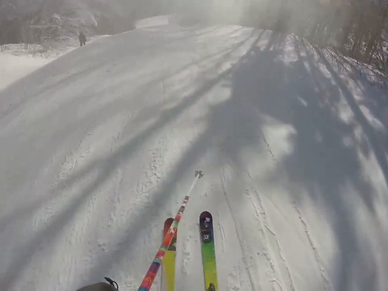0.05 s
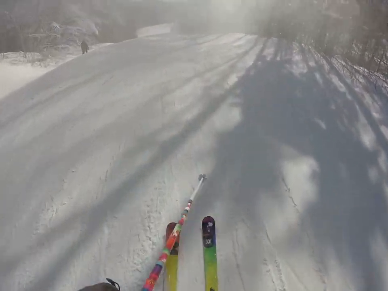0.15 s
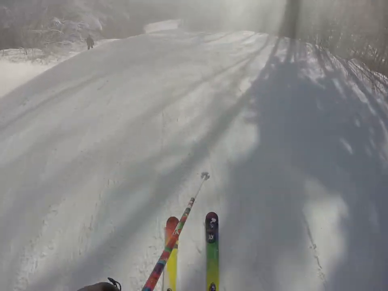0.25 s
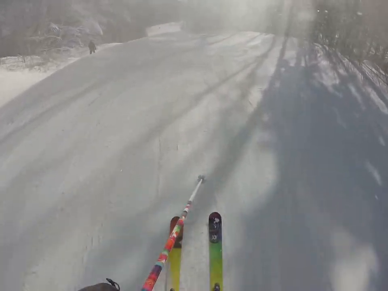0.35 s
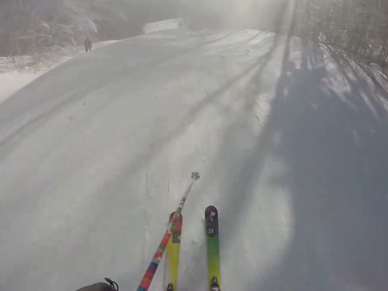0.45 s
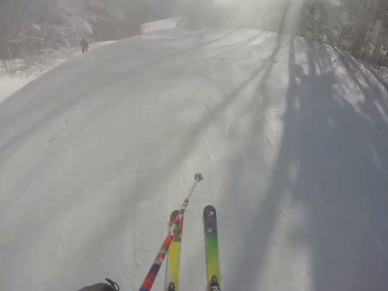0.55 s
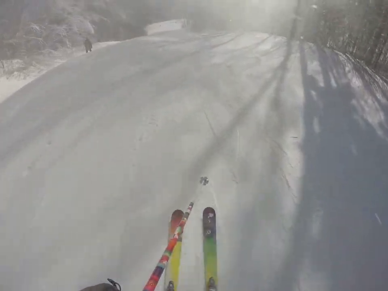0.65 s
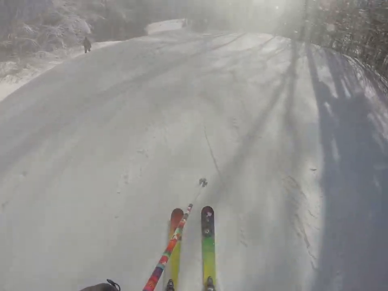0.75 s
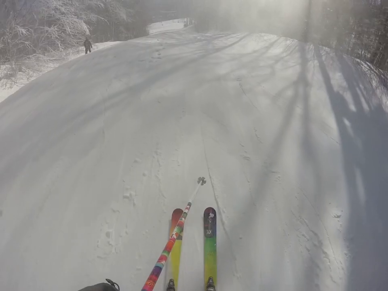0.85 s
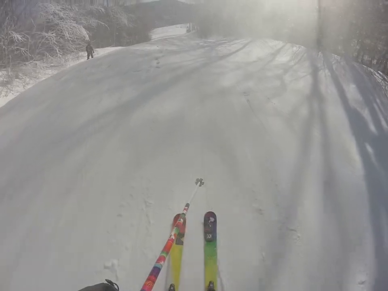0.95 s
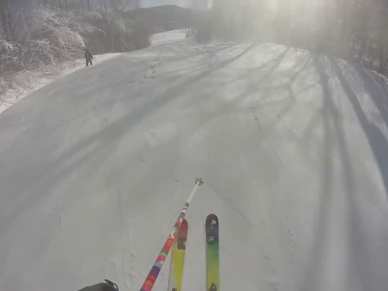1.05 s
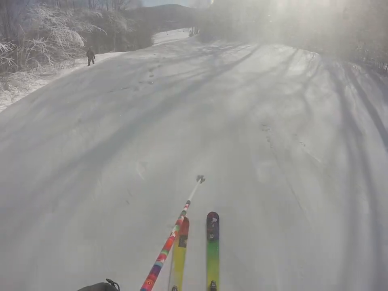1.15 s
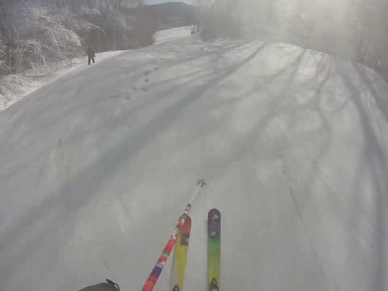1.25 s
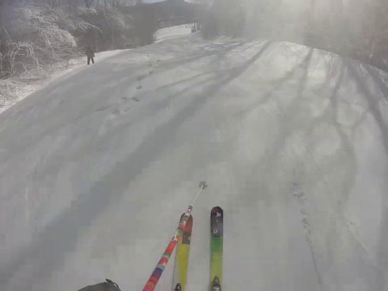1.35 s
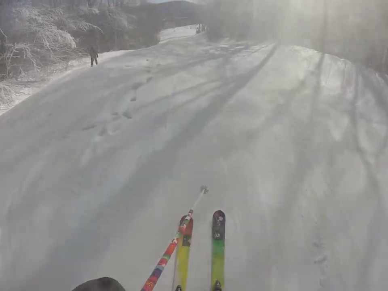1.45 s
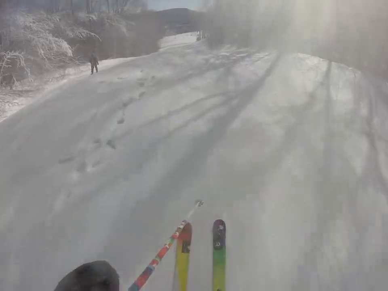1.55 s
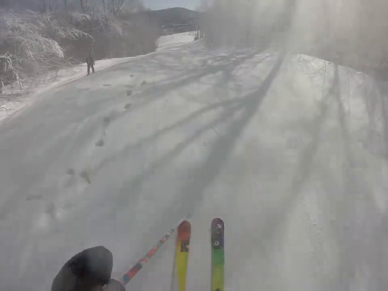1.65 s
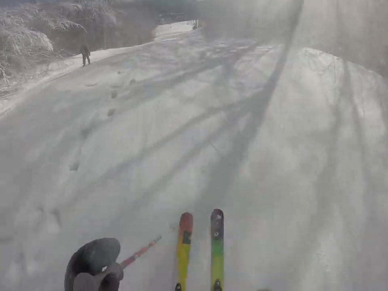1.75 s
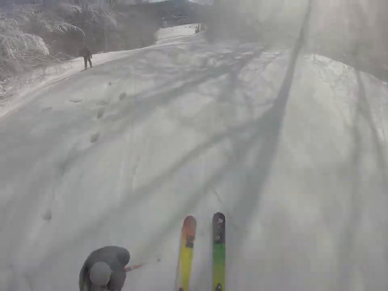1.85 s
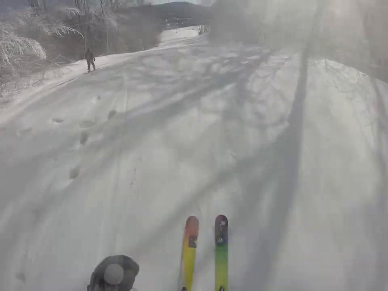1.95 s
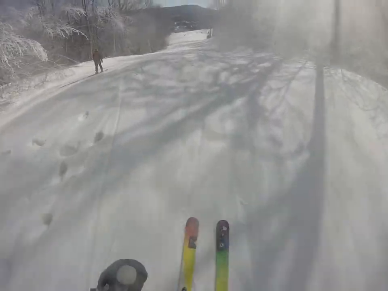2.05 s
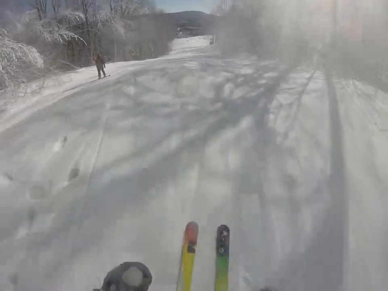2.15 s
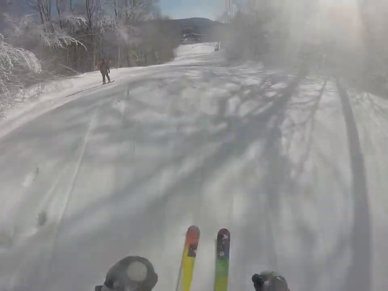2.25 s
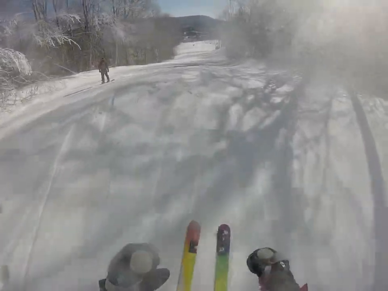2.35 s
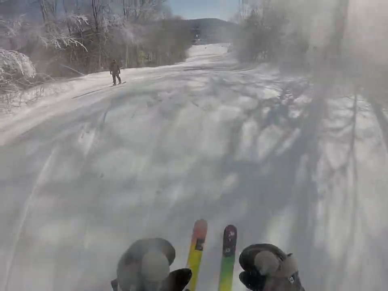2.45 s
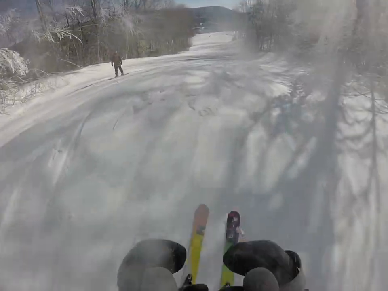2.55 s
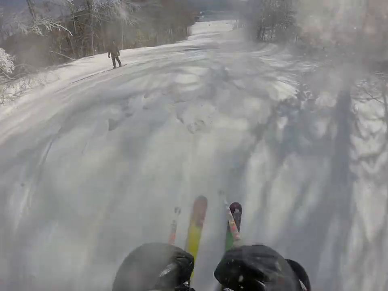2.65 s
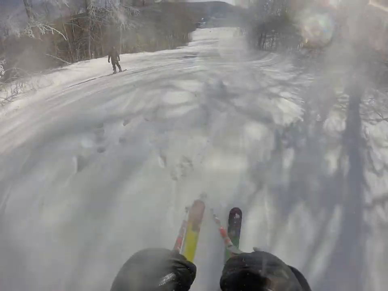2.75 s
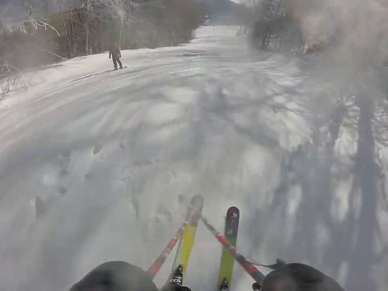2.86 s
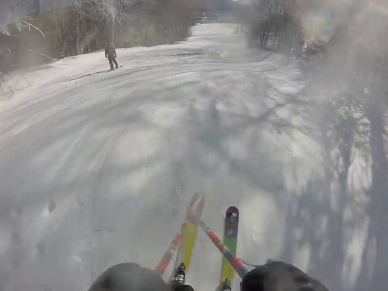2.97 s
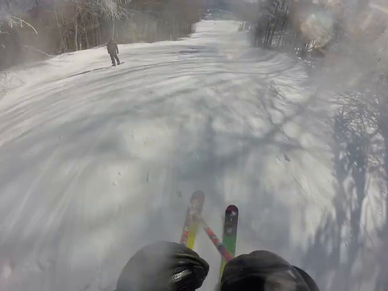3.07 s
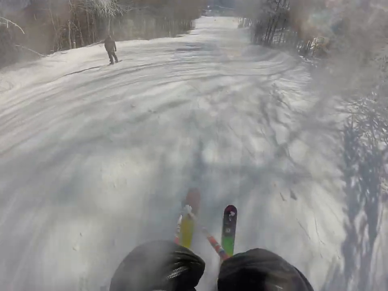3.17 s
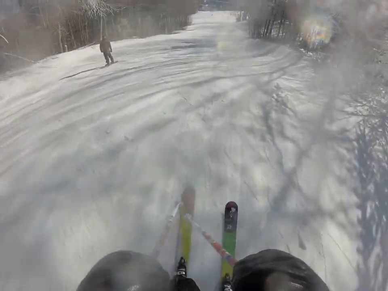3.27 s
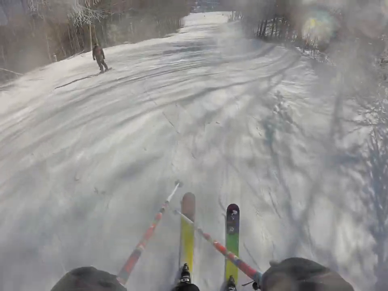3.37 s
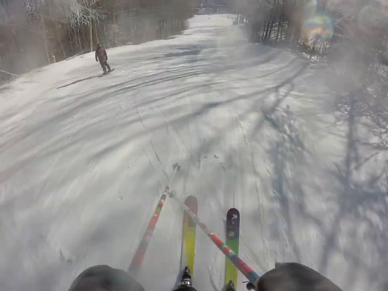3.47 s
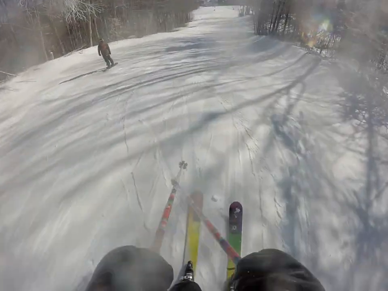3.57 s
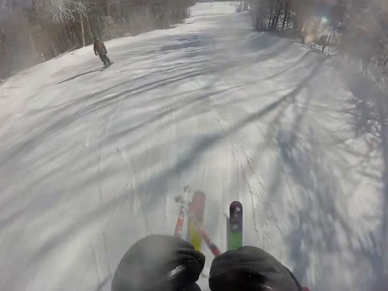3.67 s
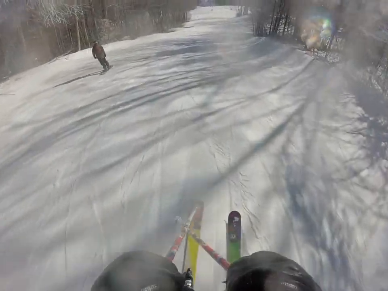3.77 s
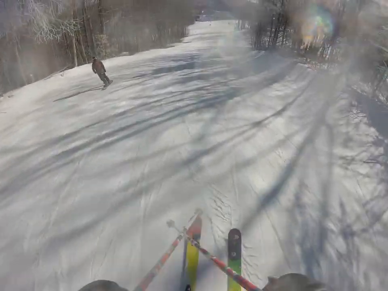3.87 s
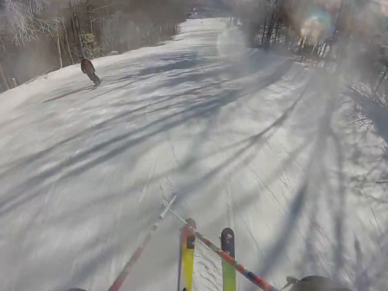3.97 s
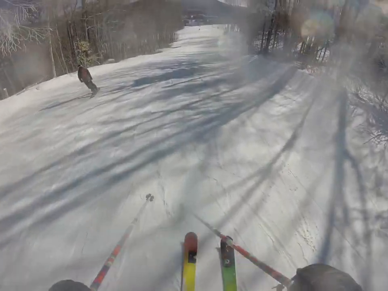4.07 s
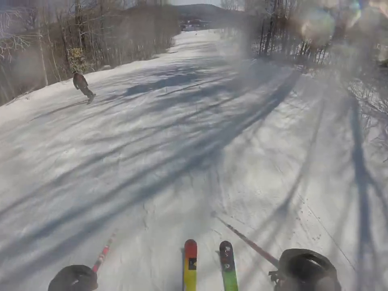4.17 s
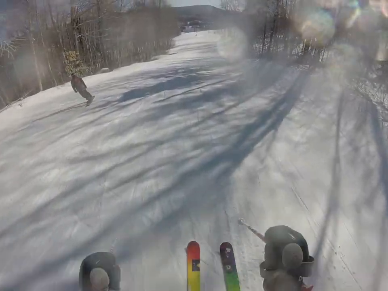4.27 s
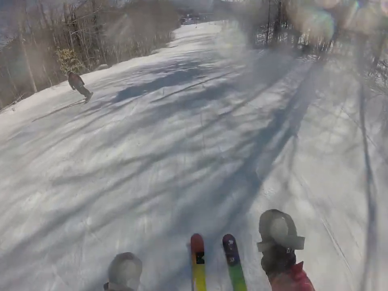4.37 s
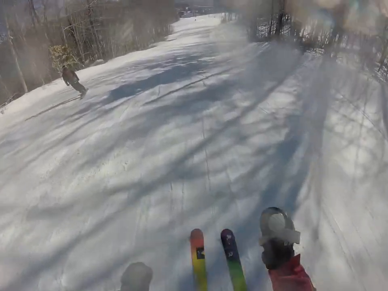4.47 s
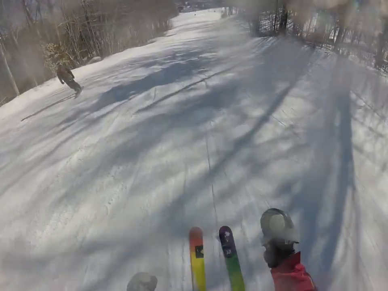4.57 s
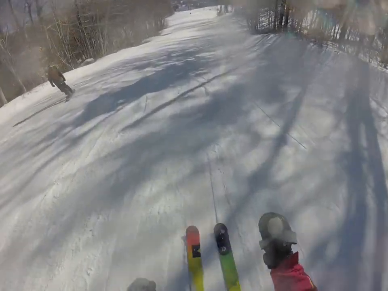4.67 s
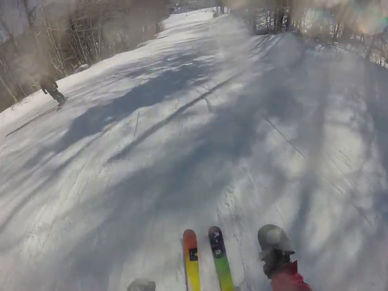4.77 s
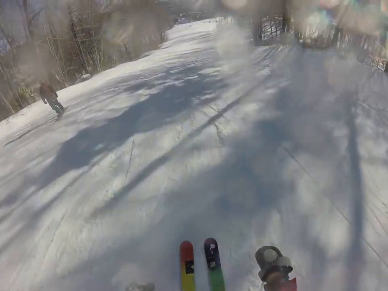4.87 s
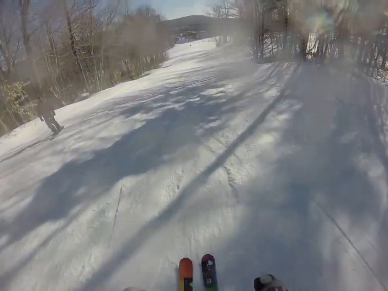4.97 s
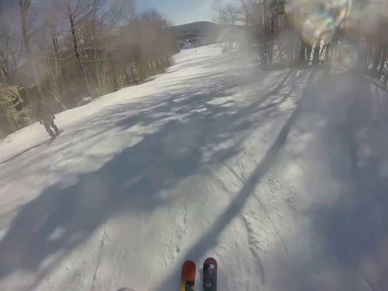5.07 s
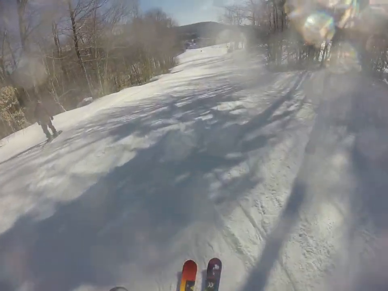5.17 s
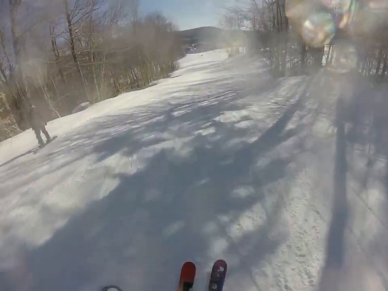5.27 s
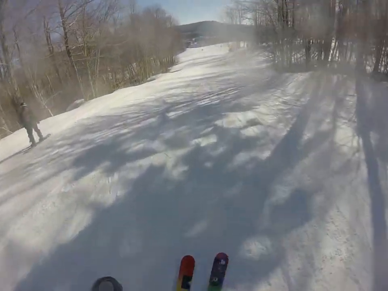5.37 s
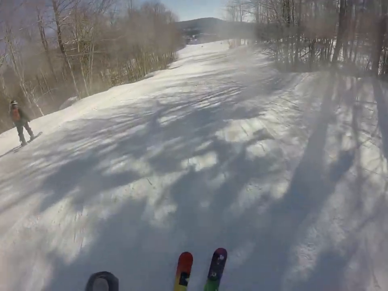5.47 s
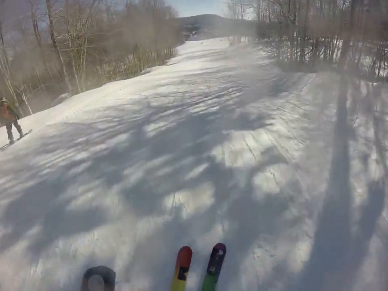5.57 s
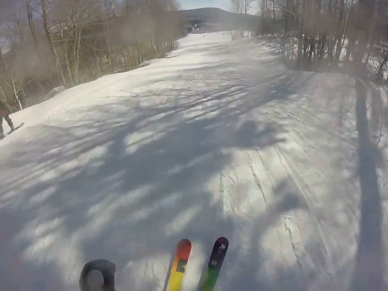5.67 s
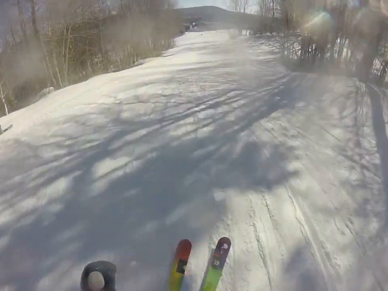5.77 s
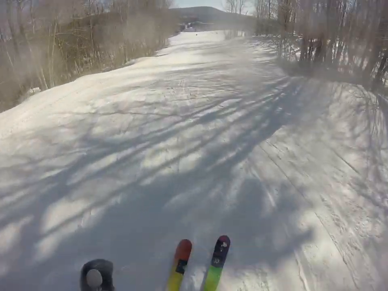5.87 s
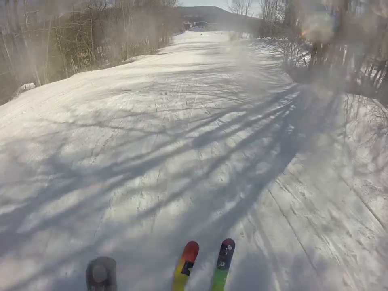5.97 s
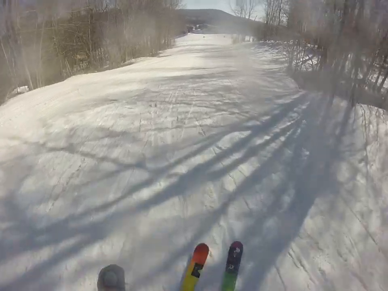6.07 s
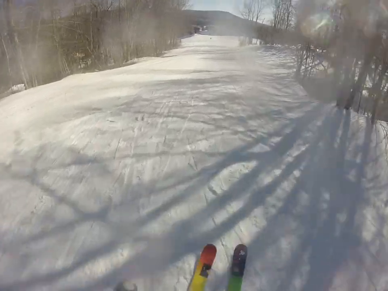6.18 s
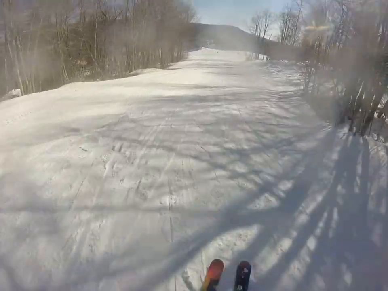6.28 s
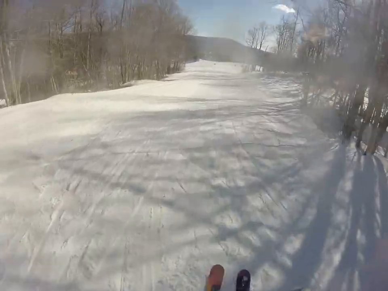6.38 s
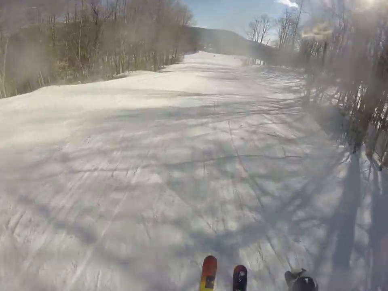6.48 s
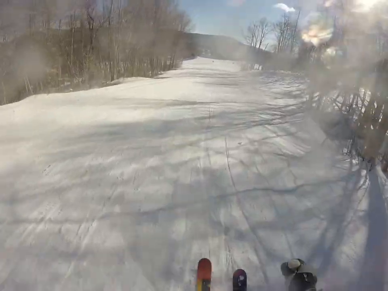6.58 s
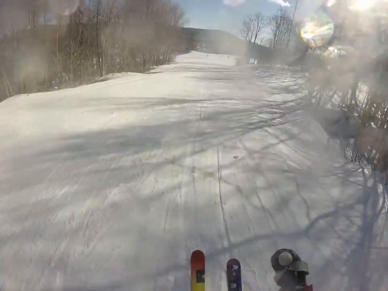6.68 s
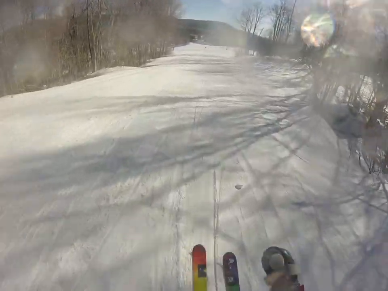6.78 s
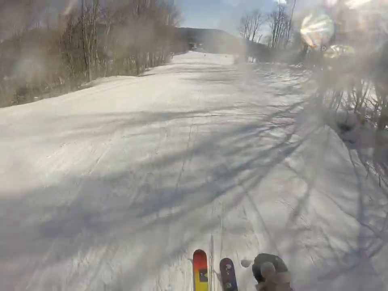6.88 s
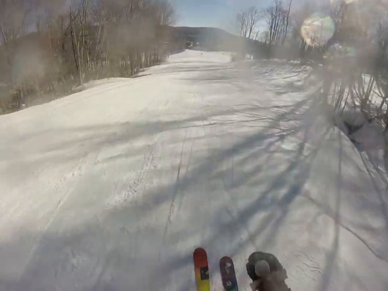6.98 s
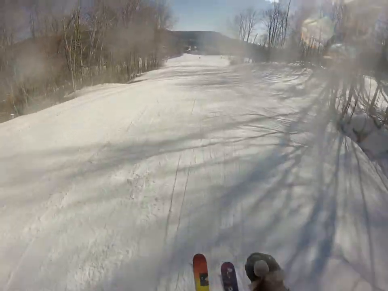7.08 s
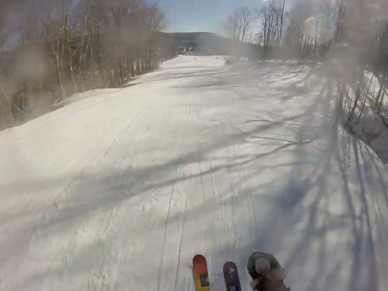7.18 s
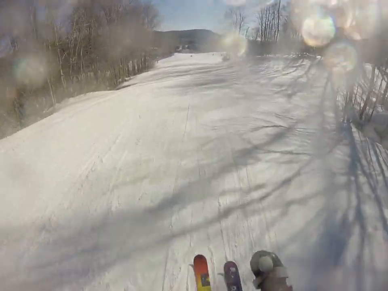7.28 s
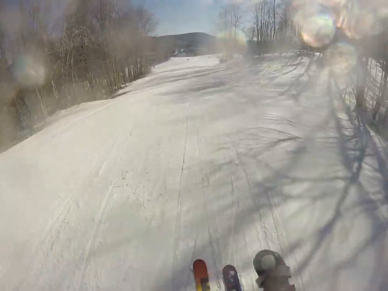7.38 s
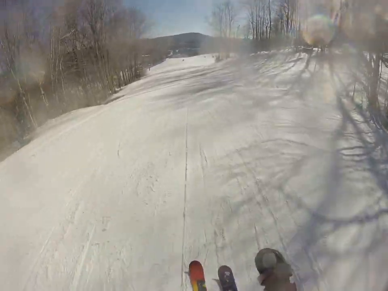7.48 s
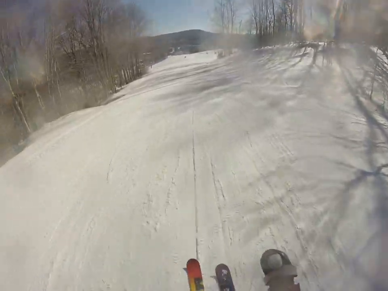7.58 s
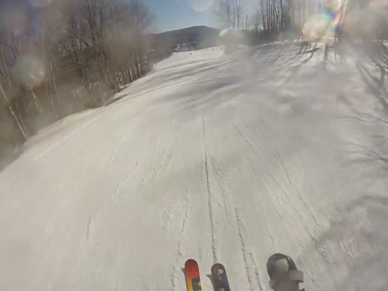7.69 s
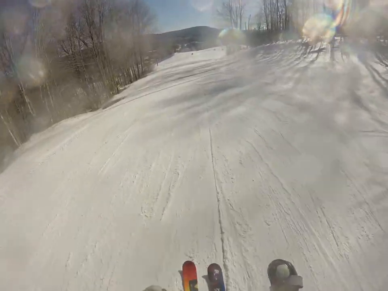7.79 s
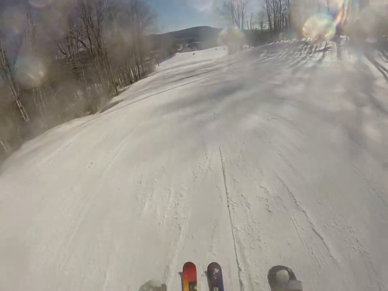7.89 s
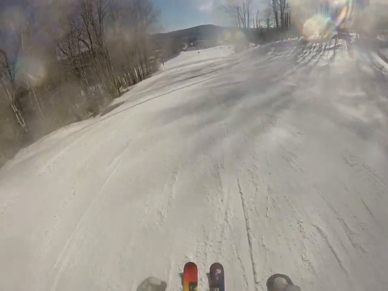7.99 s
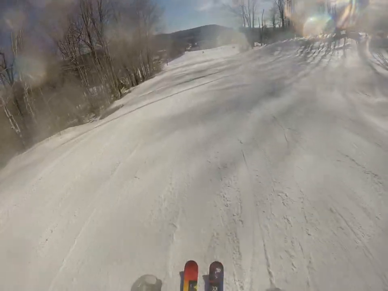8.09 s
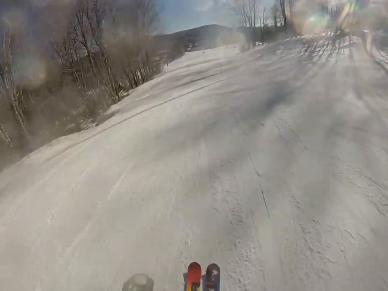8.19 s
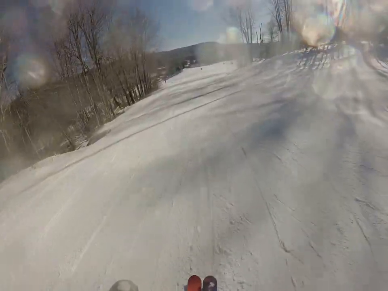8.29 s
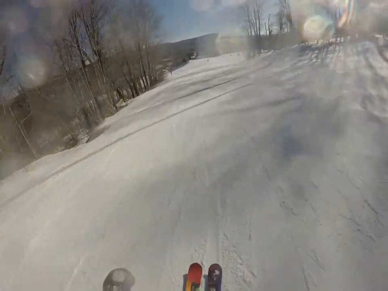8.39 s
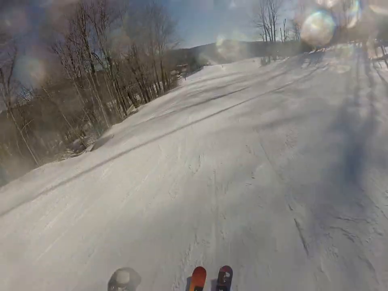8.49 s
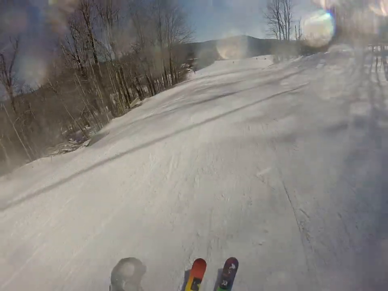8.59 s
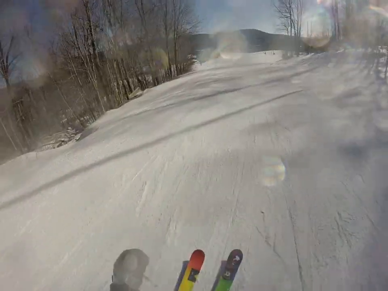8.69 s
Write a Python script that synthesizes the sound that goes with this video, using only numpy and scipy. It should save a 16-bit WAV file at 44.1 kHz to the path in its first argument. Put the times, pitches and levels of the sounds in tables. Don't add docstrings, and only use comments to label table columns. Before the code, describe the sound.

Rough gritty scraping and crackling on a camera case over ski hiss and low wind rumble, then hard knocks, then quieter steady gliding.

```python
import sys
import numpy as np
from scipy import signal
from scipy.fft import rfft, irfft, next_fast_len
from scipy.io import wavfile
from scipy.ndimage import uniform_filter1d

SR = 44100
rng = np.random.default_rng(int(sys.argv[2]) if len(sys.argv) > 2 else 0)


def inscribe(sig):
    pcm = np.round(np.clip(np.atleast_2d(sig).T, -1, 1) * 32767)
    wavfile.write(sys.argv[1], SR, pcm.astype(np.int16))


def invert_db(x):
    u = np.asarray(x, float) / 20
    return 10 ** u


N = 385434
t = np.arange(N) / SR

# t/s, hiss level/dB, shake level/dB
GLIDE = [(0.0, -40, -41), (0.9, -35.5, -39.5), (1.3, -39.5, -42.5), (1.6, -31.5, -40.5), (2.2, -41, -41.5),
         (2.5, -34, -46.5), (3.0, -39, -45.5), (3.41, -46, -49), (3.85, -44.5, -54), (4.1, -41, -42.5),
         (4.75, -42, -41), (5.43, -38, -38.5), (5.9, -38.5, -38.5), (6.26, -41.5, -41), (6.7, -38.5, -39.5),
         (7.1, -40, -38.5), (7.9, -40.5, -39.5), (8.74, -41, -42)]
# t/s, treble level/dB, body level/dB
SNOW_COLOUR = [(0, -2, 2), (0.3, 10, 0), (2.5, -2, 0.5), (2.7, -22, 1), (3.4, -4, -1), (3.55, -9, -8),
               (3.98, -11, -8), (4.1, 0.5, -2), (4.7, 1, 2.5), (5.3, -1, 0.5), (5.9, 12, 1), (6.3, 8, 1),
               (6.6, 0, -1.5), (7.2, -1, 4), (7.8, -1, 5.5), (8.2, -3, 3), (8.74, 0, -4)]
# f/Hz, density/dB per Hz
SNOW_SPECTRUM = [(250, -61), (400, -13), (750, -9), (1270, -6.5), (1420, -2.5), (2150, -3.5), (3100, -5),
                 (4400, -14), (4800, -19.5), (6300, -24.5), (8200, -28), (10900, -34.5), (11600, -34.5),
                 (13200, -42), (15100, -46), (15350, -62)]
# f/Hz, width/Hz, level/dB
CAVITY_MODES = [(1620, 300, -6), (2850, 650, -4), (4250, 500, -6), (6950, 500, 0), (9800, 1800, -10),
                (12900, 700, -6)]
# t/s, level/dB
WIND = [(0.0, -34), (0.68, -33), (1.5, -30), (1.9, -30.5), (2.55, -25.5), (2.7, -35), (3.01, -25),
        (3.4, -29.5), (3.65, -35.5), (3.9, -29.5), (4.3, -36.5), (4.7, -31), (5.0, -36), (5.5, -35.5),
        (6.25, -38), (6.9, -34), (8.0, -37), (8.74, -32.5)]
# t/s, level/dB, half length/s
GUSTS = [(0.09, -8, 0.062), (0.18, 10, 0.032), (0.28, -4.5, 0.12), (0.53, -10, 0.046), (1.51, -12, 0.052),
         (1.81, 9, 0.039), (1.96, 7, 0.17), (2.03, -10, 0.062), (2.14, 7, 0.086), (2.3, 1, 0.067),
         (2.55, 1, 0.055), (1.7, 0.5, 0.047), (0.43, 1, .05), (1.05, -1, .04), (7.5, 1, .1),
         (2.4, 8.5, 0.045), (4.02, 8.5, 0.15), (4.09, -15, 0.078), (4.43, -13, 0.093), (4.58, 1, 0.07),
         (4.71, -11, 0.056), (4.9, -7, 0.066), (5.4, -5, 0.06), (5.52, 2, 0.046), (5.56, -2, 0.044),
         (5.94, -1, .05), (6.05, 3.5, 0.14), (6.34, 8, 0.05), (6.89, 9.5, 0.074), (7.71, -4, 0.044),
         (8.53, 12.5, 0.035), (8.69, -13, 0.047)]
# f/Hz, width/Hz, level/dB
MOUNT_MODES = [(60.2, 12.7, 8.5), (36.1, 9.7, 6.5), (98, 64, -12)]
# f/Hz, width/Hz, level/dB
CASE_MODES = [(133.5, 69, 9), (205.4, 96, 7), (287, 350, -22)]
# t/s, level/dB
SCRAPE_PRESSURE = [
    (0.0, -48),
    (0.2, -37),
    (0.26, -31),
    (0.9, -29),
    (1.55, -25.5),
    (2.35, -26.5),
    (2.78, -25.5),
    (2.9, -33.5),
    (3.4, -39),
]
# t/s, level/dB, half length/s
JERKS = [(0.044, 6, 0.038), (0.184, -8.5, 0.043), (0.264, 1, 0.008), (0.3, 2, 0.027), (0.384, -2, 0.049),
         (0.476, -6.5, 0.008), (0.496, 4.0, 0.008), (0.524, 4, 0.008), (0.552, -2.5, 0.008),
         (0.62, -4, 0.012), (0.636, 2, 0.0071), (0.676, -1.5, 0.01), (0.7, 6.5, 0.012),
         (0.724, -4.5, 0.017), (0.776, -2, 0.022), (0.8, 6.0, 0.008), (0.852, -2, 0.02),
         (0.856, 6.5, 0.057), (0.956, 4.5, 0.014), (1.084, 7, 0.019), (1.136, 3.0, 0.035),
         (1.188, -10, 0.082), (1.212, 9, 0.018), (1.276, 3.5, 0.018), (1.36, -2, 0.0093),
         (1.456, 1.5, 0.01), (1.576, 6, 0.024), (1.616, -3.5, 0.012), (1.628, 7.5, 0.0092),
         (1.7, -6, 0.008), (1.792, 4, 0.012), (1.876, -4, 0.03), (1.928, 3, 0.038), (2.016, -5.5, 0.035),
         (2.128, -6, 0.009), (2.136, -5, 0.096), (2.224, 1.5, 0.037), (2.332, -4, 0.039),
         (2.436, 2.5, 0.027), (2.504, 2.5, 0.031), (2.588, 3.0, 0.047), (2.68, 3, 0.02),
         (2.764, -3.5, 0.036), (2.804, 2.5, 0.024), (2.844, -4, 0.014), (2.896, 4.5, 0.0066),
         (2.912, -2.0, 0.012), (2.976, 4.5, 0.033), (3.032, -4.5, 0.021), (3.092, 0, 0.008),
         (3.132, -2.5, 0.012), (3.16, 2, 0.008), (3.196, 1.5, 0.018), (3.268, 0.5, 0.008),
         (3.288, -4, 0.013), (3.3, 4.0, 0.0073), (3.412, 0.5, 0.012), (3.436, -2, 0.021)]
# t/s, level/dB
BRUSH = [
    (3.5, -66),
    (3.6, -55),
    (3.64, -49),
    (3.69, -55),
    (3.74, -49),
    (3.79, -41),
    (3.83, -54),
    (3.9, -60),
    (3.96, -53),
    (4.1, -60),
]
# f/Hz, density/dB per Hz
GRIT_SPECTRUM = [(410, -43), (700, -52), (747, -59), (830, -9), (934, -16), (1020, -11), (2100, 1),
                 (2370, 3), (3640, -4), (4260, -1), (5600, -6.5), (6700, -3.5), (7900, -7), (9110, -4.5),
                 (10500, -6.5), (14600, -9), (15400, -20), (16000, -49)]
# f/Hz, rms level/dB
LIFT_PARTIALS = [(685, -52), (1028, -52)]
# t/s, peak level/dB, centre f/Hz
SCRAPE_CRACKS = [(0.2142, -22, 6790), (0.2426, -17, 8730), (0.4886, -19, 4310), (0.519, -16, 4410),
                 (0.635, -16, 4160), (0.6886, -10, 10400), (0.7412, -13, 4230), (0.796, -9, 4470),
                 (0.8978, -10, 7720), (0.9196, -8, 4120), (1.194, -19, 4020), (1.2587, -6, 4820),
                 (1.4115, -9, 4260), (1.4883, -11, 4540), (1.6235, -13, 4290), (1.6581, -6, 4430),
                 (1.863, -7, 4210), (1.8959, -21, 4220), (2.0193, -15, 5180), (2.045, -9, 4370), (2.67, -15, 7770),
                 (2.7832, -14, 4110), (2.894, -13, 7140), (2.977, -13, 7230), (3.1525, -19, 4620),
                 (3.297, -18, 5020), (3.4334, -29, 7510), (3.4444, -29, 5220)]
# t/s, peak level/dB, centre f/Hz
CRACKS = [(2.858, -11, 6490), (2.899, -9, 9300), (2.935, -10.5, 8940), (2.9506, -10, 9000),
          (2.983, -13, 6900), (3.075, -12.5, 8100), (3.0992, -26, 9330), (3.1423, -14, 12100),
          (3.19, -18, 8830), (3.1965, -16, 6540), (3.265, -31, 6600), (3.334, -24, 9000),
          (3.413, -23, 8980), (3.4832, -20.5, 11400), (3.638, -19, 5500), (3.6592, -13, 6560),
          (3.663, -15, 6560), (3.6778, -24, 6590), (3.7144, -23, 8800), (3.754, -21, 9150),
          (3.7748, -20, 5800), (3.7845, -19, 6870), (3.799, -17.5, 4970), (3.845, -23, 8940),
          (3.858, -19, 9000), (3.88, -20.5, 6770), (3.903, -21, 5380), (3.923, -26, 9750),
          (3.9808, -11, 11100), (4.042, -24.5, 11300)]
# t/s, peak level/dB, centre f/Hz
LONE_CRACKS = [(0.7066, -12, 7470), (0.8494, -8, 8910), (0.8764, -8, 5050), (0.8894, -8, 6720),
               (1.0974, -7, 7710), (3.2424, -32, 12400), (3.3716, -27, 7040), (3.4669, -24, 10700),
               (3.5318, -32, 5090), (3.9815, -20, 6600), (3.7238, -26, 8860), (3.7383, -22, 7390),
               (3.7604, -19, 9900), (3.7913, -21, 5100), (3.8114, -27, 5130), (3.2824, -28, 5060),
               (3.3864, -27, 7170), (3.2124, -25, 6530), (3.8214, -28, 5690), (4.651, -37, 5010),
               (7.9992, -45, 12500), (8.2057, -36, 12500), (8.3659, -37, 11500), (8.4547, -41, 7170),
               (8.4757, -20, 4500), (8.4762, -43, 11000), (3.926, -31, 8000), (3.7275, -26, 12000),
               (3.806, -30, 9000), (3.876, -32, 9000), (4.6785, -35, 5000), (4.9902, -37, 5000),
               (6.353, -37, 4500), (6.856, -36, 11000)]
# t/s, peak level/dB, ring f/Hz
TICKS = [(2.7391, -3, 1820), (2.783, -15, 2060), (2.859, -11, 2440), (2.9182, -11.5, 2520),
         (3.044, -19, 2490), (3.073, -16, 1730), (3.083, -18, 1520), (3.0748, -16, 2300),
         (3.086, -15, 2600), (3.141, -25, 1700), (3.1804, -5, 2080), (3.205, -22, 2530),
         (3.2247, -31, 2420), (3.291, -12.5, 1990), (3.299, -11, 2530), (3.2988, -20, 1270),
         (3.304, -14, 2050), (3.63, -22.5, 1150), (3.737, -16, 1270), (3.7405, -19, 1620),
         (3.378, -12, 2160), (3.4065, -17, 2520), (3.458, -23, 2060), (3.503, -23, 2310),
         (3.5322, -19, 2440), (3.62, -18.5, 2230), (3.6384, -10, 2260), (3.6597, -11, 2410),
         (3.676, -17, 2500), (3.704, -18, 2830), (3.736, -2.5, 2120), (3.7625, -16, 2520),
         (3.799, -19, 1860), (3.8146, -10, 2470), (3.9035, -15, 2500), (4.01, -18, 1950),
         (4.1213, -20, 2540)]
# t/s, peak level/dB, ring f/Hz, edge level/dB
LONE_TICKS = [(0.7407, -13, 2570, -22), (0.7956, -22, 2800, -19), (1.081, -11, 2480, -32),
              (1.089, -11, 2730, -29), (1.489, 0, 2650, -13), (2.0412, -6.5, 2400, -23),
              (4.6783, -14, 2080, -50), (4.99, -12.5, 2370, -41), (5.5169, -19, 1930, -48),
              (5.9113, -15, 2220, -44), (6.353, -16, 2470, -41), (6.856, -14, 2700, -35),
              (7.774, -19, 1900, -71), (8.4755, -13, 2400, -51), (8.6472, -21, 2300, -82)]
# f/Hz, width/Hz, level/dB
WALL_MODES = [(1270, 190, -8), (1620, 154, 7), (1950, 79, 9), (2400, 560, 1), (2670, 220, -6.5)]
# t/s, peak level/dB, contact/ms, ring t60/ms, case ring level/dB
THUMPS = [(2.721, -24, 18, 74, -26.5), (2.734, -2, 3.3, 130, -17), (3.001, -19, 8.3, 60, -38),
          (3.057, -10, 5, 24, -27), (3.073, -1, 2.55, 20, -12.5), (3.076, -4.5, 4.6, 190, -17.5),
          (3.181, -4, 1.8, 53, -12.5), (3.275, -13, 5, 34, -41), (3.295, 4, 3.6, 40, -15),
          (3.378, -10.5, 2.3, 93, -16), (3.459, -18, 2.4, 20, -21), (3.626, -1.5, 8.3, 66, -23.5),
          (3.642, -8.5, 5.9, 230, -29), (3.737, -5, 1.6, 57, -9), (3.805, 0, 4.1, 80, -38),
          (2.601, -20, 2.5, 66, -28), (2.881, -27, 2.1, 51, -24.5), (3.593, -15, 5.5, 60, -52),
          (3.61, -15, 5, 40, -44)]
# f/Hz, t60/s, level/dB
KNOCK_MODES = [(225.5, 0.032, 3), (306, 0.028, -35), (540, 0.037, -7.5)]


def level(x):
    return x / np.sqrt(np.mean(x ** 2))


def colour(x, spectrum):
    size = next_fast_len(N)
    hz, db = np.transpose(spectrum)
    f_hz = np.arange(size // 2 + 1) * SR / size + 1
    gain = invert_db(np.interp(np.log(f_hz), np.log(hz), db))
    return irfft(rfft(x, size) * gain, size)[:N]


def ring(x, hz, width_hz):
    return signal.lfilter(*signal.iirpeak(hz, hz / width_hz, SR), x)


def butter(x, order, hz, kind):
    return signal.sosfilt(signal.butter(order, hz, kind, fs=SR, output="sos"), x)


def walk(rate_hz):
    hold = int(SR / rate_hz)
    steps = np.repeat(rng.standard_normal(N // 8)[:N // hold + 1], hold)
    return level(uniform_filter1d(uniform_filter1d(steps, hold), hold)[:N])


def add(out, s, x):
    i = int(s * SR)
    out[i:i + len(x)] += x[:N - i]


def curve(table, after=None):
    s, *columns = np.transpose(table)
    return [np.interp(t, s, c, right=after) for c in columns]


def bumps(table, steep=1):
    return sum(db * np.clip(steep * (1 - np.abs(t - s) / half_s), 0, 1) for s, db, half_s in table)


def snow(db, treble_db, body_db):
    bright_db = 0.8 * (db + 46) + treble_db
    grains = invert_db(0.52 * walk(400) + 0.78 * walk(25))
    hiss = colour(grains * rng.standard_normal(N), SNOW_SPECTRUM)
    hiss = hiss + sum(invert_db(g) * ring(hiss, hz, width_hz) for hz, width_hz, g in CAVITY_MODES)
    low = butter(hiss, 2, 1200, "low")
    high = signal.sosfiltfilt(signal.butter(2, 3300, "high", fs=SR, output="sos"), hiss)
    body = low * (invert_db(body_db + 1.0 * walk(6.6)) - 1)
    treble = high * (invert_db(bright_db.clip(-20, 5)) - 1)
    return invert_db(db) * level(hiss + body + treble)


def shake(modes, db):
    force = invert_db(2.0 * walk(13)) * rng.standard_normal(N)
    sway = 0
    for hz, width_hz, g in modes:
        sway = sway + invert_db(g) * level(ring(ring(force, hz, 2.46 * width_hz), hz, width_hz))
    swell = uniform_filter1d(sway ** 2, size=SR // 8)
    return invert_db(db) * level(sway / swell ** 0.35)


def contact():
    let_go_db_s = 252
    held = curve(SCRAPE_PRESSURE)[0] + bumps(JERKS, steep=2.16)
    held = held - let_go_db_s * (t - SCRAPE_PRESSURE[-1][0]).clip(0)
    return np.where(t < BRUSH[0][0], held, curve(BRUSH, after=-120)[0])


def scrape(db):
    contact_db = uniform_filter1d(db, size=SR // 3)
    spread = np.clip(0.52 - 0.065 * (contact_db + 29), 0.45, 1.3)
    slots = np.repeat(rng.standard_normal(N // 14 + 1), 14)[:N].clip(-3, 2.9)
    power = uniform_filter1d(np.exp(2 * spread * slots - 2 * spread ** 2), size=21)
    size = np.sqrt(np.abs(power)) * invert_db(0.7 * walk(70))
    return invert_db(db + 1.0) * level(colour(size * rng.standard_normal(N), GRIT_SPECTRUM))


def lift():
    tone = sum(invert_db(db + 2.5) * np.sin(2 * np.pi * hz * t) for hz, db in LIFT_PARTIALS)
    fade_db = -9 * t ** 2
    return tone * invert_db(fade_db + 2.5 * walk(14))


def strap():
    rub = ring(rng.standard_normal(N) * invert_db(3.0 * walk(25.8)), 1760, 420)
    db, fade_db_s = -35.5, 20
    return level(rub) * invert_db(db - fade_db_s * t)


def cracks():
    out, u = np.zeros(N), t[:200]
    late, size, spot = rng.random((len(CRACKS), 3)).T
    s, db, hz = np.transpose(CRACKS)
    after_db, after_spread_db = -14.5, 0
    after = zip(s + 0.0025 + 0.0028 * late, db + after_db + after_spread_db * (2 * size - 1), 5000 + 4000 * spot)
    table = list(CRACKS) + list(LONE_CRACKS) + list(SCRAPE_CRACKS) + list(after)
    noise = rng.standard_normal((len(table), 200)) * u * np.exp(-u / 0.00025)
    noise = butter(noise, 2, (3300, 14000), "band")
    for (s, db, hz), burst in zip(table, noise):
        narrow = level(ring(burst, hz, 0.052 * hz))
        broad = level(ring(burst, hz, 1.1 * hz))
        slip = 0.38 * narrow + 0.52 * broad + 0.3 * level(burst)
        add(out, s, invert_db(db - 1.0) * slip / np.abs(slip).max())
    return out


def ticks():
    out, u = np.zeros(N), t[:500]
    table = [tuple(row) + (-90,) for row in TICKS] + list(LONE_TICKS)
    noise = rng.standard_normal((len(table), 2, 500))
    rattles = 0
    for hz, width_hz, g in WALL_MODES:
        rattles = rattles + invert_db(g) * ring(ring(noise[:, 0], hz, 3 * width_hz), hz, width_hz)
    edges = butter(noise[:, 1], 1, (4000, 8000), "band")
    for (s, db, hz, edge_db), rattle, edge in zip(table, rattles, edges):
        swell = (u * hz / 1.34 * np.exp(1 - u * hz / 1.3)) ** 2
        wall = np.sin(2 * np.pi * hz * u) * swell
        wall = wall + 0.32 * level(rattle) * np.tanh(u / 0.00016) * np.exp(-u / 0.0036)
        add(out, s, invert_db(db - 4.5) * wall / np.abs(wall).max())
        add(out, s, invert_db(edge_db + 11) * edge * np.tanh(u / 0.00031) * np.exp(-u / 0.0007))
    return out


def thumps():
    mount_hz, clatter_db, clatter_t60_s = 56.7, -22, 0.03
    out, u = np.zeros(N), t[:SR // 3]
    case = sum(np.cos(2 * np.pi * hz * u) * invert_db(g - 60 * u / t60_s) for hz, t60_s, g in KNOCK_MODES)
    case = np.convolve(np.hanning(int(0.0029 * SR)), -case)
    case = case / np.abs(case).max()
    loose = butter(rng.standard_normal((len(THUMPS), len(u))), 2, (800, 1400), "band")
    loose = invert_db(clatter_db - 60 * u / clatter_t60_s) * level(loose)
    for (s, db, contact_ms, t60_ms, case_db), clatter in zip(THUMPS, loose):
        push = -np.hanning(int(contact_ms * SR / 500) + 3)
        mount = np.convolve(push, np.cos(2 * np.pi * mount_hz * u) * invert_db(-60e3 * u / t60_ms))
        add(out, s - contact_ms / 2e3, invert_db(db) * mount / np.abs(mount).max())
        add(out, s, invert_db(case_db) * case)
        add(out, s, invert_db(case_db) * clatter)
    return butter(out, 1, 30, "high")


def scene():
    snow_db, case_db = curve(GLIDE)
    hiss = snow(snow_db, *curve(SNOW_COLOUR)) * invert_db(1.0)
    rumble = shake(MOUNT_MODES, curve(WIND)[0] + bumps(GUSTS)) + shake(CASE_MODES, case_db)
    gear = scrape(contact()) + cracks() + ticks() + thumps()
    return (hiss + rumble + gear + lift() + strap())[None]


def band_limit(x):
    return signal.sosfilt(signal.butter(12, 16500, fs=SR, output="sos"), x)


def record(dry):
    rounded = np.tanh(0.62 * dry) / 0.59
    top_hz = 15300
    mix = signal.sosfilt(signal.ellip(8, 0.3, 60, top_hz, fs=SR, output="sos"), rounded)
    return band_limit(mix)


dry = scene()
out = record(dry)
inscribe(out)
```